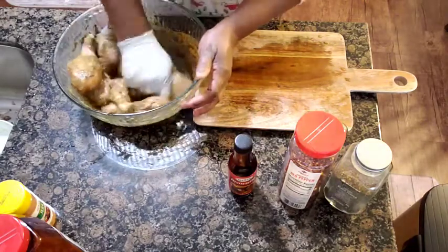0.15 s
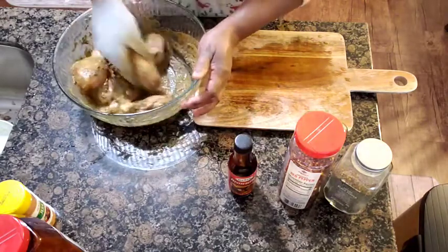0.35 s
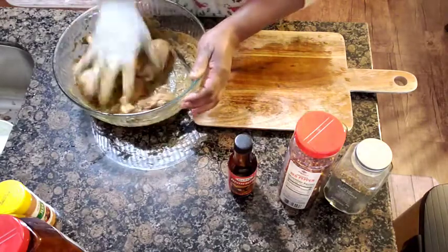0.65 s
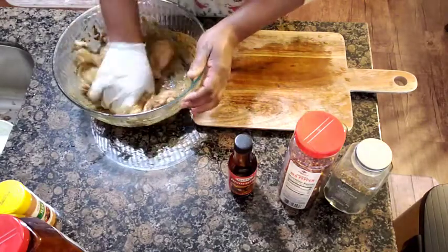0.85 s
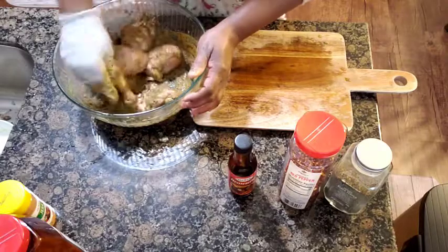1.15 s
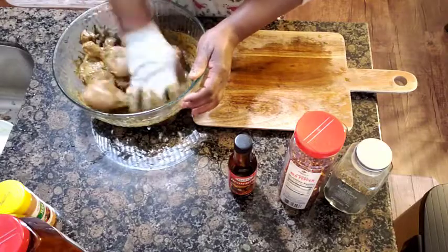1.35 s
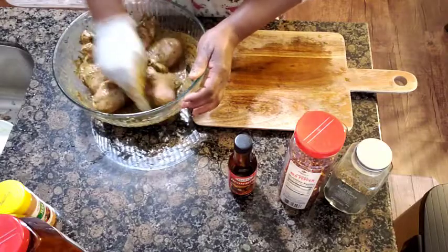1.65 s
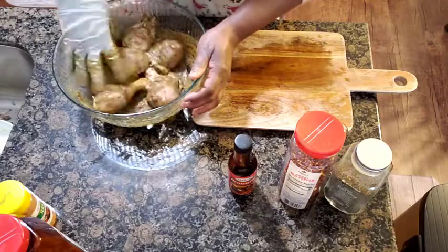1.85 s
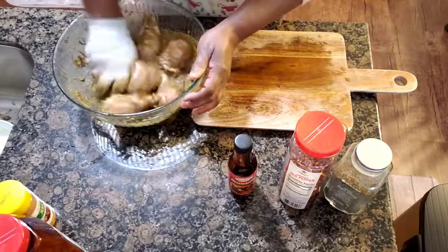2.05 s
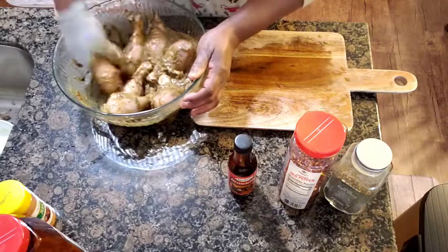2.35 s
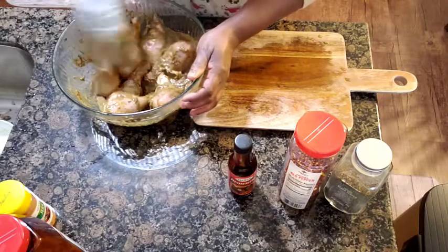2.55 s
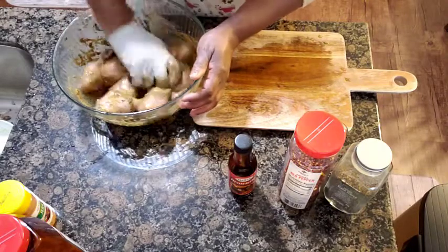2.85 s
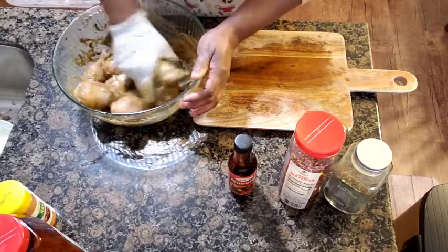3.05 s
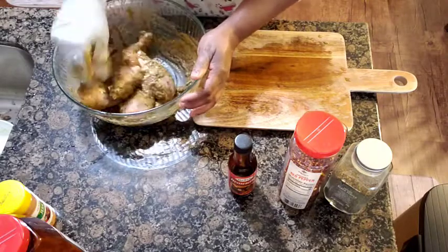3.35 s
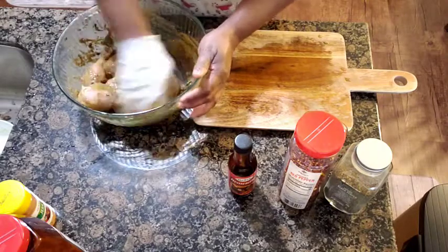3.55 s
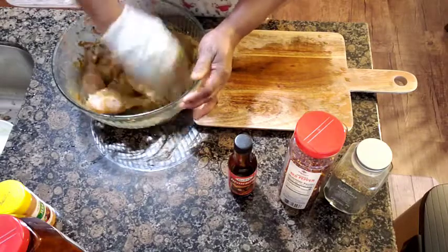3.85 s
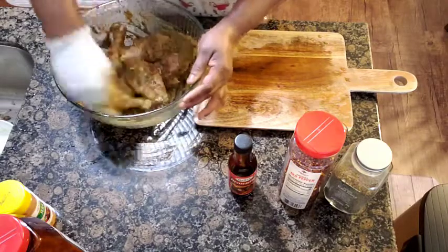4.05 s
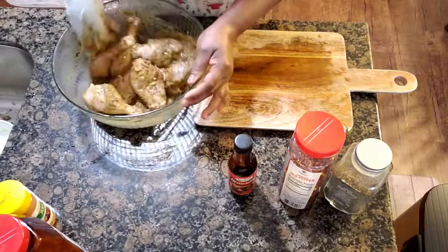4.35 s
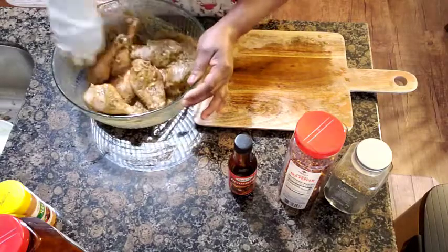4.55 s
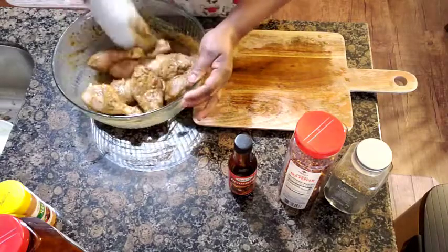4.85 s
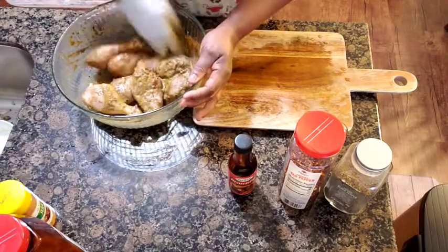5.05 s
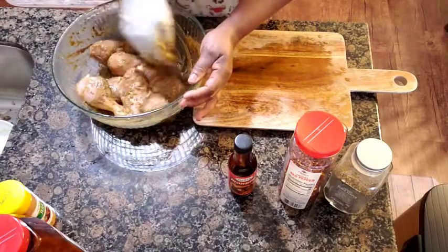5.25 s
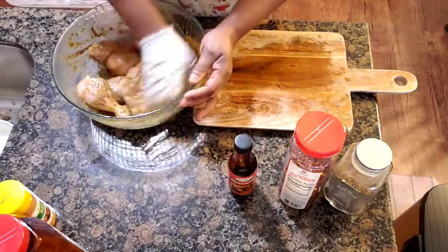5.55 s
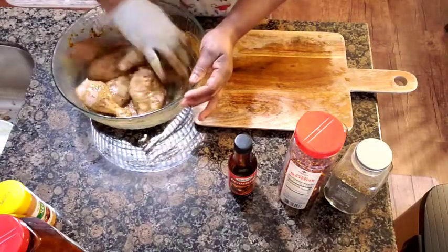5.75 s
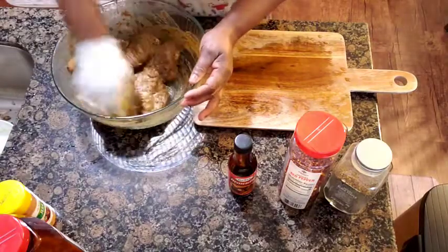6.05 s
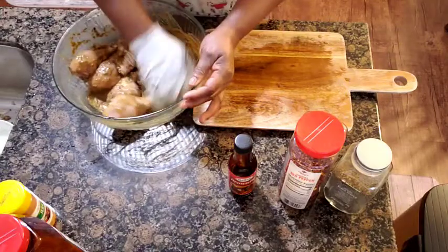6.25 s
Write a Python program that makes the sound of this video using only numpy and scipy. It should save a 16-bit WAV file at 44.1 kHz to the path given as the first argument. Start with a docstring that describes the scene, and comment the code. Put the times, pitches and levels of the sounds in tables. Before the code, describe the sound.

A hard, wet knock of meat and bone on a glass bowl opens with a deep thump. Then come sticky snaps, squelches, small bubble pops and soft low thuds as a gloved hand turns raw chicken. Another hard knock falls near the middle, and quieter ones follow. Close stereo microphone in a small, hard kitchen with a faint low appliance hum.

```python
"""Gloved fingers turn raw chicken legs in marinade in a glass bowl on a stone counter, for 6.4 s.
A hard knock opens with a deep thump, another falls near 2.4 s, lesser ones follow: bowl modes under a wet slap.
From the first second on, lumps thud on one low mode, wet skin snaps in wide-band clicks, bubbles pop in rising
sines, and the peeling film hisses and squelches in shaped noise and tiny bubbles.
A small hard kitchen answers the blows with decaying noise; an appliance hums throughout over moving air."""
import sys
import numpy as np
from scipy import signal
from scipy.fft import rfft, irfft, next_fast_len
from scipy.io import wavfile
from scipy.ndimage import uniform_filter1d, map_coordinates

SR = 44100
rng = np.random.default_rng(int(sys.argv[2]) if len(sys.argv) > 2 else 0)


def digitize_waveform(pressure):
    """Quantize a signal to 16-bit integers and store it at the path in sys.argv[1].

    Rows of a 2-D input are taken as channels; values are limited to [-1, 1].
    """
    field = np.atleast_2d(pressure).T
    bounded = np.clip(field, -1, 1)
    quanta = np.round(bounded * 32767).astype(np.int16)
    wavfile.write(sys.argv[1], SR, quanta)


N = 282240

# Bone on glass; the tilts are relative: start_s, level_db, treble_db, bass_db, near_600_hz_db, room_db
BONE_KNOCKS = [(-0.012, -21, -1.5, -4.5, 3.5, -2.5), (0.1, -44, 5, -13, -2, 0),
               (0.2289, -50.5, 4, -32, -22, 5.5), (0.831, -40.5, 1.5, 4, -4.5, 3),
               (0.843, -40.5, 11.5, -21, -2, -4), (0.861, -33.5, -10, 1, -0.5, -11),
               (1.026, -38, 2.5, 4, -1, -1.5), (2.4148, -16.5, -3.5, -9.5, -8.5, -3.5),
               (2.598, -41, -2, 2.5, -18, -2), (3.7, -43.5, -2, -2, 5, 0), (3.708, -50.5, -6, 9, -34, 0),
               (5.67, -29.5, -8, -6.5, 1.5, -4), (5.752, -34.5, -2.5, 0, 1.5, -4.5),
               (6.091, -60, -13.5, 8.5, 9.5, 4), (6.328, -49.5, -3, 1, -2, 1)]
# Modes of the meat-damped bowl: frequency_hz, relative_level_db, t60_s
BOWL_MODES = [(78.4, -14.5, 0.084), (119.3, -19.5, 0.23), (159.5, -20.5, 0.08), (184, -10, 0.18),
              (216.7, -5, 0.25), (253.9, -4, 0.36), (339.7, -4, 0.13), (385.2, -11, 0.32),
              (465.3, -11, 0.2), (612.4, -8.5, 0.23), (707, -17, 0.33), (786, -16, 0.3), (898, -19.5, 0.15),
              (917, 7.5, 0.017), (965, -12, 0.067), (1049, -17.5, 0.18), (1600, -19.5, 0.04),
              (1766, -12.5, 0.065), (1844, -13, 0.04), (2335, -8, 0.015), (2700, -7.5, 0.015),
              (3540, -21.5, 0.016)]
# Meat meeting glass, relative spectrum: frequency_hz, density_db_per_hz
SLAP_SPECTRUM = [(120, -27), (300, -28), (600, 9.5), (1100, 1), (1600, -2), (2500, -17), (5000, -28)]
# Soft lumps rocking the bowl: start_s, level_db, ring_hz, length_s, rumble_to_ring_ratio
SOFT_THUDS = [(0.511, -63, 332.4, 0.087, 1.9), (0.662, -48.5, 258.3, 0.077, 0.39),
              (0.787, -57, 287, 0.1, 0.87), (1.432, -61.5, 250, 0.07, 0.19),
              (1.96, -47.5, 253, 0.063, 0.36), (2.036, -62, 256, 0.13, 0.36), (2.198, -60, 234, 0.078, 0.8),
              (2.611, -43.5, 251.5, 0.079, 0.34), (2.672, -44, 368, 0.043, 0.22),
              (2.748, -42.5, 356.2, 0.052, 0.44), (2.812, -52, 370, 0.033, 0.96),
              (2.956, -48, 250.7, 0.053, 0.31), (3.521, -50.5, 216, 0.056, .5),
              (3.988, -55.5, 240.6, 0.077, .8), (4.08, -52, 238, 0.042, 0.74),
              (4.248, -54.5, 412, 0.028, 0.36), (4.544, -55.5, 253.4, 0.068, 0.54),
              (4.625, -56.5, 256.5, 0.092, 0.43), (5.554, -55, 234, 0.03, 0.68),
              (6.363, -48, 248, 0.14, 0.53)]
# Wet skin tearing loose: time_s, peak_db, lower_treble_db (relative)
SKIN_SMACKS = [(0.074, -32, -18), (0.226, -41, -36), (0.7973, -32, 9), (0.843, -25.5, 18), (0.99, -40, 7),
               (1.557, -40, -16), (1.5633, -32.5, 9), (1.7802, -36, -23), (1.951, -38, -12),
               (2.1294, -40.5, -4), (2.138, -29, -8), (2.18, -30, 6), (2.186, -32.5, 5),
               (2.4127, -21.5, 15.5), (2.595, -32, 6), (2.6008, -20.5, 1.5), (2.838, -45, -14),
               (3.3212, -30, -5), (3.4975, -47, -36), (3.549, -35.5, -13.5), (4.113, -36, 9.5),
               (4.2434, -23.5, 5), (4.5315, -51.5, -24), (4.625, -39, -20), (4.635, -42.5, -4),
               (4.648, -46.5, -16), (4.738, -39.5, -28), (4.8463, -49, -18), (5.026, -48, -36),
               (5.108, -45, -3), (5.123, -51, -20), (5.1338, -41, 18), (5.1421, -28.5, -25),
               (5.5707, -33, 12), (5.6673, -32, 20.5), (5.8134, -42, 5), (5.9395, -41, -9), (6.086, -42, 0)]
# Air pockets bursting: start_s, level_db, pitch_hz
AIR_POPS = [(0.226, -39.5, 1470), (0.638, -54.5, 1000), (0.784, -49.5, 1780), (0.845, -22, 1577),
            (1.0271, -42, 3420), (1.5576, -39, 1370), (2.0715, -49, 980), (2.0814, -45, 975),
            (2.1149, -46.5, 926), (2.14, -32.5, 2170), (2.14, -31, 1465), (2.1825, -43, 1150),
            (2.1947, -40, 2750), (2.261, -44.5, 4380), (2.768, -48.5, 3750), (2.78, -45.5, 3800),
            (2.829, -53, 1510), (2.868, -52.5, 1370), (2.9473, -54, 1700), (3.054, -59, 2150),
            (3.22, -48, 1920), (3.277, -51, 1040), (3.303, -52.5, 2840), (3.353, -37, 3820),
            (3.552, -51.5, 3370), (3.5944, -49, 3080), (4.074, -47.5, 2040), (4.2441, -38, 2600),
            (4.624, -47, 2830), (4.7288, -50, 2070), (4.737, -53.5, 1500), (4.892, -52.5, 2890),
            (5.133, -48.5, 960), (5.1448, -39, 3030), (5.57, -40.5, 2190), (5.572, -54, 1080),
            (5.574, -37, 5030), (5.64, -50, 1320), (5.754, -47, 2730), (5.803, -46, 2460),
            (5.82, -48, 2510), (6.266, -54, 2600)]
# Film peeling off glass, glove and meat (a negative fade grows):
# start_s, hiss_db, squelch_db, swell_s, fade_db_per_s
FILM_PEELS = [(0, -48, -45.5, 0.01, 90), (0.229, -53, -60, 0.039, 60), (.45, -69, -68.5, 0.083, 13),
              (.62, -67.5, -72, 0.027, -34), (.79, -56.5, -57, 0.051, 90), (1.03, -68, -76, 0.0052, 3),
              (1.29, -62.5, -102.5, 0.022, 37), (1.378, -59, -69, 0.009, 50), (1.555, -62, -56, 0.011, 82),
              (1.57, -48.5, -78, 0.048, 90), (1.78, -66, -95, 0.011, 16), (1.94, -61.5, -65.5, 0.014, -12),
              (2.099, -60, -52, 0.063, 69), (2.271, -57.5, -91, 0.01, 68), (2.41, -58, -51, 0.0081, 51),
              (2.598, -58, -61.5, 0.0053, 21), (2.83, -57, -62.5, 0.0052, 76), (3.039, -71, -74, 0.053, 1),
              (3.2, -70, -65.5, 0.07, 50), (3.309, -56, -85, 0.0072, 110), (3.49, -66, -74, 0.022, 17),
              (3.54, -68, -65.5, 0.021, -4), (3.688, -61, -62, 0.0064, 49), (3.969, -63, -69.5, 0.021, -20),
              (4.1, -57.5, -81, 0.11, 197), (4.24, -56.5, -59, 0.028, 61), (4.525, -67.5, -78, 0.013, 6.5),
              (4.61, -63, -64.5, 0.011, 31), (4.72, -65.5, -64, 0.014, 32), (4.85, -79, -69, 0.022, 60),
              (4.93, -61.5, -79, 0.011, 200), (5.03, -69, -78.5, 0.011, 42),
              (5.096, -51.5, -63, 0.032, 293.5), (5.17, -63, -70.5, 0.013, 54),
              (5.525, -67.5, -70.5, 0.024, 4), (5.565, -66, -61, 0.013, 47), (5.67, -62, -61.5, 0.017, 28),
              (5.93, -68.5, -86, 0.0046, 74), (6.083, -63.5, -62.5, 0.011, -3)]
# Hiss of the film, relative spectrum: frequency_hz, density_db_per_hz
FILM_SPECTRUM = [(1760, -27), (3000, -8), (3830, -9.5), (4670, -5), (6840, 0), (7430, 2), (8990, -5),
                 (11000, -1.5), (15300, -1), (15750, -67)]
# Squelch of the film, relative spectrum: frequency_hz, density_db_per_hz
SQUELCH_SPECTRUM = [(700, -15), (1100, -7.5), (2000, -12), (3500, -12.5), (5000, -18), (7000, -43)]
# Low end near 59 Hz, the opening knock's deep thump and then the wavering hum: time_s, level_db
LOW_END_LEVEL = [(0, -45), (0.15, -65), (0.8, -57.5), (1.34, -66), (2.33, -65.5), (2.5, -57.5), (3.56, -59),
                 (4.56, -71), (5.61, -58.5), (6.4, -64)]
# The appliance's casing, relative spectrum: frequency_hz, density_db_per_hz
DRONE_SPECTRUM = [(300, -37), (350, -27), (385, 13), (420, -4), (465, 4.5), (520, -21.5)]
# Moving air, relative spectrum: frequency_hz, density_db_per_hz
AIR_SPECTRUM = [(18, -28.5), (30, -2), (81, -12.5), (224, -16), (476, -7.5), (602, -18.5), (868, -19),
                (1670, -47.5), (3640, -43), (4610, -62), (15300, -62.5), (15750, -99)]
# Reverberation of the kitchen: frequency_hz, t60_s
KITCHEN_DECAY = [(100, 0.51), (260, 0.61), (700, 0.6), (1800, 0.47), (5000, 0.4), (12000, 0.029)]
# Likeness of diffuse sound at the two ports: frequency_hz, left_right_correlation
PORT_LIKENESS = [(60, 0.86), (200, 0.95), (500, 0.68), (1200, 0.068), (4000, 0.15), (12000, 0.043)]
# Colour of the microphone ports: frequency_hz, left_minus_right_db
PORT_BALANCE = [(60, 4), (180, 2.0), (550, 3.5), (1650, 3.5), (4970, 4), (15000, -1.5)]

SQUELCH_SWELL, SQUELCH_FADE = 0.53, 0.99  # squelch against hiss: factors on swell time and fade rate
AIR_DB, DRONE_DB = -62, -70.5  # centres of the wavering levels
DRY_S = 0.41  # after about this long a peel has run dry
TOP_HZ = 16500  # band limit


def amp(db):
    """Logarithmic level: decibels to gain."""
    return 10 ** (np.asarray(db) / 20)


def unit(x):
    """Power normalisation: x at rms 1."""
    return x / np.sqrt(np.mean(x ** 2) + 1e-20)


def along(points, hz):
    """Logarithmic interpolation: reads (frequency, value) points on a log frequency axis."""
    f, v = np.transpose(points)
    return np.interp(np.log(hz + 1), np.log(f + 1), v)


def wobble(rate):
    """Random modulation: a smooth curve with rate knots a second."""
    knots = rng.standard_normal(int(N * rate / SR) + 4)
    return map_coordinates(knots, [np.arange(N) * rate / SR])


def filtered(x, response):
    """Linear filtering: the spectrum of x times a response of frequency."""
    n = x.shape[-1]
    m = next_fast_len(n + 8192)
    return irfft(rfft(x, m) * response(np.fft.rfftfreq(m, 1 / SR)), m)[..., :n]


def mid_side_weights(hz):
    """Partial coherence: mid and side shares that give two ports the tabled correlation."""
    turn = np.arccos(np.clip(along(PORT_LIKENESS, hz), -1, 1)) / 2
    return np.array([np.cos(turn), np.sin(turn)])


def rush(spectrum, spiky_db, patchy_db):
    """Modulated noise: stereo, rms 1, in tiny bursts both ports share and time-frequency patches."""
    noise = rng.standard_normal((2, N)) * amp(spiky_db * wobble(700))
    z = signal.stft(noise, nperseg=512)[2]
    field = uniform_filter1d(rng.standard_normal(z.shape[1:]), size=8, axis=0)
    field = uniform_filter1d(field, size=6, axis=1)
    pair = signal.istft(z * amp(patchy_db * unit(field)), nperseg=512)[1][:, :N]
    mid, side = filtered(pair, lambda hz: amp(along(spectrum, hz)) * mid_side_weights(hz))
    return unit(np.array([mid + side, mid - side]))


def add(track, s, sound):
    """Superposition: mixes a stereo sound into the track at s seconds; what lies before zero is lost."""
    start = round(s * SR)
    sound = sound[:, max(-start, 0):]
    track[:, max(start, 0):][:, :sound.shape[1]] += sound


def answer(sound, wet_db, loud_s=1):
    """Reverberation: a fresh noise tail, decaying at each frequency's own rate, joins the direct sound."""
    hz, t, z = signal.stft(rng.standard_normal((2, SR // 2)), SR, nperseg=256)
    decay = amp(-60 * t / along(KITCHEN_DECAY, hz)[:, None])
    tail = signal.istft(z * decay, SR, nperseg=256)[1]
    mid, side = rfft(tail) * mid_side_weights(np.fft.rfftfreq(tail.shape[1], 1 / SR))
    tail = irfft([mid + side, mid - side], tail.shape[1])
    tail *= amp(wet_db) / np.linalg.norm(tail[0])
    tail[:, :110] = 0  # the nearest wall is a few milliseconds away
    sound = np.atleast_2d(sound)
    # the walls return chiefly the first loud_s seconds
    sent = sound * np.exp(-np.arange(sound.shape[1]) / SR / loud_s)
    heard = signal.fftconvolve(sent, tail, axes=1)
    near = sound * np.ones((2, 1))
    heard[0, 2:near.shape[1] + 2] += near[0]  # the left port is a little farther from the bowl
    heard[1, :near.shape[1]] += near[1]
    return heard


def knocks():
    """Modal excitation: each blow rings the damped bowl modes and slaps wetly, with its own spectral tilt."""
    out, t = np.zeros((2, N + SR)), np.arange(SR // 3) / SR
    ports = np.array([[1], [-1]])  # a mode reaches the two ports out of step
    onset = 1 - np.exp(-(t / 0.001) ** 2)
    for s, db, treble_db, bass_db, belly_db, room_db in BONE_KNOCKS:
        tilt = [(380, bass_db), (480, belly_db), (680, belly_db),
                (800, 0.013), (1050, 0.0036), (1500, treble_db)]
        # random spread of level (dB), relative pitch and port phase (radians per Hz)
        chance = rng.standard_normal((len(BOWL_MODES), 3)) * [1.5, .003, .0003]
        ring = 0
        for (hz, level, t60), (db_off, detune, lead) in zip(BOWL_MODES, chance):
            decay = amp(level + along(tilt, hz) + db_off - 60 * t / t60)
            ring = ring + decay * np.sin(2 * np.pi * hz * (1 + detune) * t + hz * lead * ports)
        splash = unit(filtered(rng.standard_normal(len(t)), lambda hz: amp(along(SLAP_SPECTRUM, hz))))
        slap = filtered(splash, lambda hz: amp(along(tilt, hz))) * amp(2.5 - 60 * t / 0.058)
        heard = answer((ring + slap) * onset, wet_db=room_db + 2.5, loud_s=0.0085)
        add(out, s, amp(db) * heard)
    return out[:, :N]


def thuds():
    """Driven resonance: a soft push holds one low mode over a rumble until the hand damps it."""
    out, t = np.zeros((2, N + SR)), np.arange(SR // 3) / SR
    for s, db, hz, length, rumble in SOFT_THUDS:
        push = np.exp(-(t / length) ** 6) * (1 - np.exp(-t / 0.0057))
        noise = rng.standard_normal(len(t))
        blur = unit(filtered(noise, lambda f: 1 / (1 + ((f - hz) / 130) ** 2)))
        heard = answer(push * (np.sin(2 * np.pi * hz * t) + rumble * blur), wet_db=-11)
        add(out, s, amp(db) * heard)
    return out[:, :N]


def smacks():
    """Adhesive release: a partly shared crackle swells into one wide-band impulse and dies away."""
    out, t = np.zeros((2, N + SR)), np.arange(SR // 30) / SR
    snap_s = .006
    swell = np.exp(-abs(t - snap_s) / np.where(t < snap_s, .0013, .002))
    for s, db, low_db in SKIN_SMACKS:
        shared, *own = rng.standard_normal((3, len(t)))
        crack = swell * (0.37 * shared + 0.57 * np.array(own))
        crack[:, round(snap_s * SR)] += 2.2
        colour = [(900, low_db - 33.0), (1800, low_db - 0.5), (4000, low_db + 2.0), (5500, 5.5),
                  (7500, 12.5), (9000, 4.0), (15300, 7.5), (15800, -19.5)]
        crack = filtered(crack, lambda hz: amp(along(colour, hz)))
        heard = answer(crack / abs(crack).max(), wet_db=-9)
        add(out, s + .0025 - snap_s, amp(db) * heard)  # the snap falls 2.5 ms after the tabled time
    return out[:, :N]


def pops():
    """Bubble resonance: a burst spits wetly and rings for a few cycles while its pitch climbs."""
    out, t = np.zeros((2, N + SR)), np.arange(SR // 20) / SR
    for s, db, hz in AIR_POPS:
        turns = hz * t
        envelope = np.exp(-turns / 6.3) * (1 - np.exp(-turns / 0.5))
        blip = envelope * np.sin(2 * np.pi * turns * (0.976 + 0.0017 * turns))
        noise = rng.standard_normal(len(t))
        spit = unit(filtered(noise, lambda f: (f / hz) ** 2 / (1 + (f / hz) ** 3)))
        heard = answer(blip + 0.3 * spit * t / .002 * np.exp(-t / .002), wet_db=-13)
        add(out, s, amp(db) * heard)
    return out[:, :N]


def kneading():
    """Film rupture: peeling marinade hisses and crackles; lower down it squelches with bubbles."""
    _, hiss_db, squelch_db, _, _ = np.transpose(FILM_PEELS)
    flutter = amp(1.5 * np.array([wobble(45), wobble(45)]))
    crackle = .3 * bubbles(rate=200, low_hz=3000, span=4, cycles=6)  # sticky threads snap
    hiss = unit(rush(FILM_SPECTRUM, spiky_db=1.0, patchy_db=2.0) + crackle)
    gurgle = 0.31 * bubbles(rate=240, low_hz=1187, span=3.55, cycles=3.2)
    squelch = unit(rush(SQUELCH_SPECTRUM, spiky_db=1.0, patchy_db=2.0) + gurgle)
    hiss_level = flutter[0] * peels(hiss_db, 1, 1)
    squelch_level = flutter[1] * peels(squelch_db, SQUELCH_SWELL, SQUELCH_FADE)
    return hiss_level * hiss + squelch_level * squelch


def peels(levels_db, swell_share, fade_factor):
    """Incoherent addition: peels swell, then fade or slowly grow at their own rate until they run dry;
    powers add."""
    t, power = np.arange(N) / SR, np.zeros(N)
    for (s, _, _, swell, fade), db in zip(FILM_PEELS, levels_db):
        age, rise = np.maximum(t - s, 0), swell * swell_share
        faded_db = fade * fade_factor * np.maximum(age - rise, 0)
        drying_db = 20 * (age / DRY_S) ** 4
        power += (np.minimum(age / rise, 1) * amp(db - faded_db - drying_db)) ** 2
    return np.sqrt(power)


def bubbles(rate, low_hz, span, cycles):
    """Bubble ensemble: random damped sines, rate a second, from low_hz to span times that, at rms 1."""
    count = int(rate * N / SR)
    when, pitch, size, pan = rng.random((count, 4)).T
    t = np.arange(256) / SR
    turns = (low_hz * span ** pitch)[:, None] * t
    envelope = np.exp(-turns / cycles) * (1 - np.exp(-turns / 0.45))
    blip = (1.02 - size[:, None]) ** -.45 * envelope * np.sin(2 * np.pi * turns)
    at = ((when * N).astype(int)[:, None] + np.arange(len(t))).ravel()
    pair = [np.bincount(at, (blip * side[:, None]).ravel(), N + len(t))[:N]
            for side in (0.29 + pan, 1.4 - pan)]
    return unit(np.array(pair))


def background():
    """Periodic and random noise: the first thump and unsteady mains hum with octave, low drone, moving air."""
    low_db = np.interp(np.arange(N) / SR, *np.transpose(LOW_END_LEVEL))
    phase = 2 * np.pi * np.cumsum(59 + 2.1 * wobble(13.0)) / SR
    low_level = np.sqrt(2) * amp(low_db + 0.45 * wobble(4.9))
    octave = amp(-12.5 + 1.33 * wobble(6.3)) * np.sin(2 * phase)
    thump_and_hum = low_level * (np.sin(phase) + octave)
    drone = amp(DRONE_DB + 0.72 * wobble(3.4)) * rush(DRONE_SPECTRUM, spiky_db=-3.0, patchy_db=-2.0)
    air = amp(AIR_DB + 0.21 * wobble(23.0)) * rush(AIR_SPECTRUM, spiky_db=0.0, patchy_db=1.0)
    return thump_and_hum + drone + air


def scene():
    """Superposition: all sources add at the microphone."""
    return knocks() + thuds() + smacks() + pops() + kneading() + background()


def record(dry):
    """Receiver response: the ports differ in colour; deep bass and all above the band limit are cut."""
    ports = lambda hz: amp(np.array([[.5], [-.5]]) * along(PORT_BALANCE, hz))
    bass_cut = lambda hz: 1 / (1 + (39 / (hz + 1)) ** 12) ** .5
    return filtered(dry, lambda hz: ports(hz) * bass_cut(hz) * (hz < TOP_HZ))


dry = scene()
out = record(dry)
digitize_waveform(out)
```